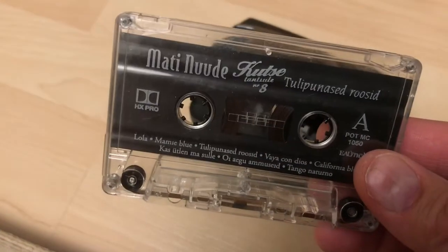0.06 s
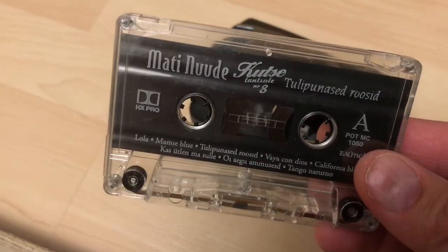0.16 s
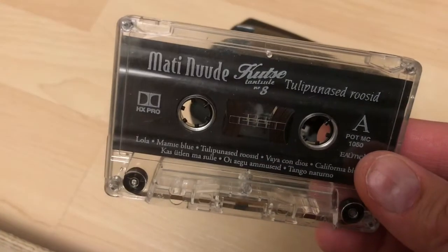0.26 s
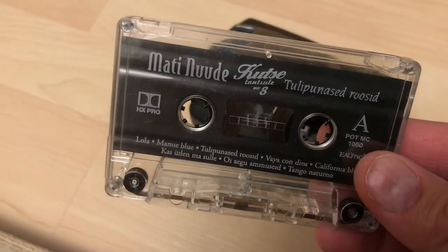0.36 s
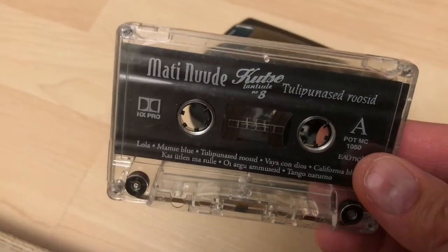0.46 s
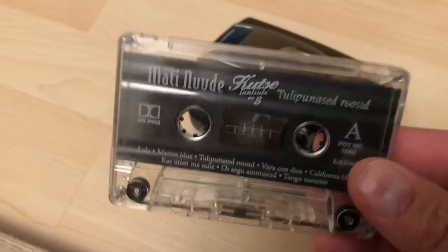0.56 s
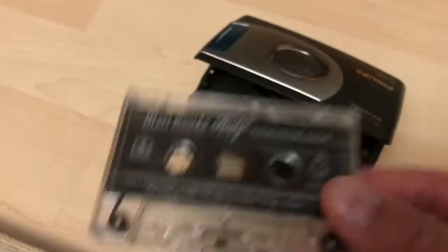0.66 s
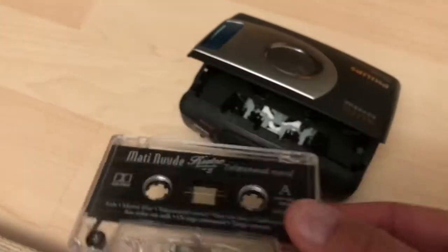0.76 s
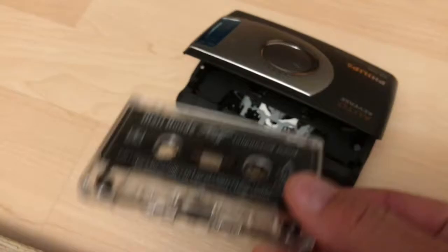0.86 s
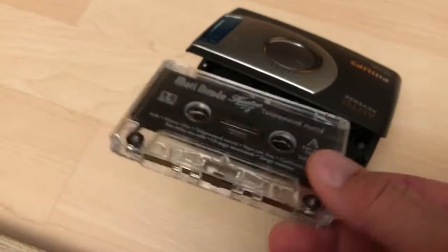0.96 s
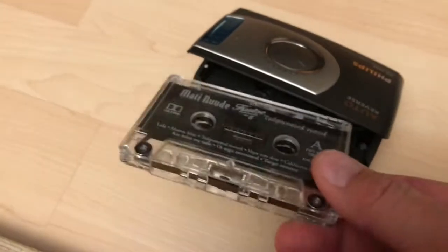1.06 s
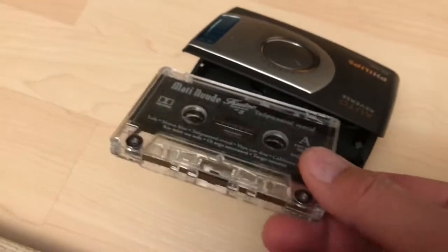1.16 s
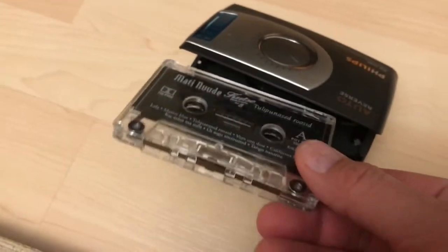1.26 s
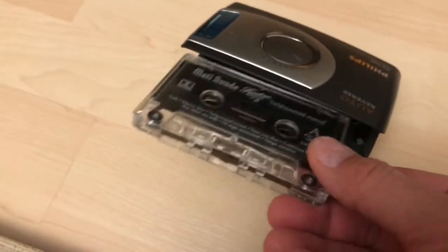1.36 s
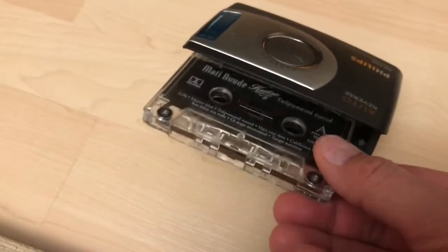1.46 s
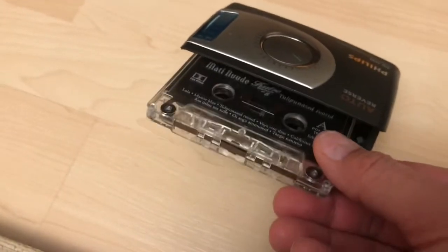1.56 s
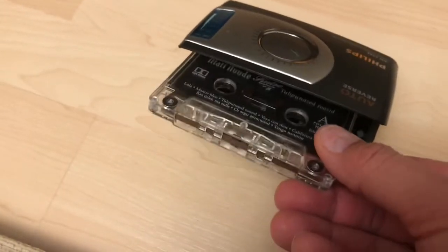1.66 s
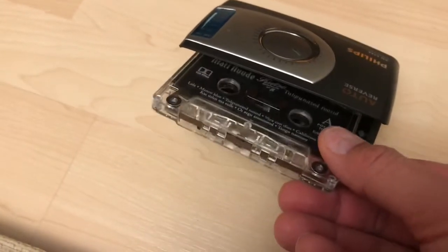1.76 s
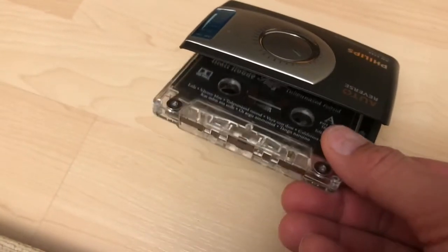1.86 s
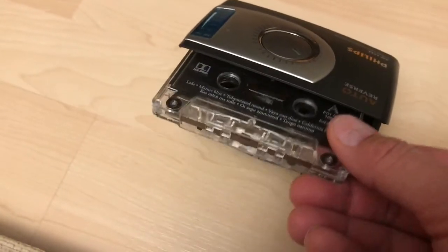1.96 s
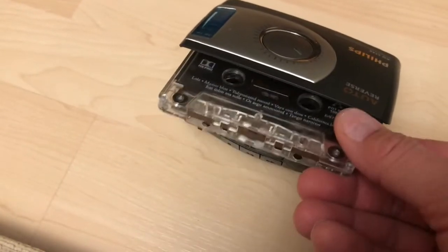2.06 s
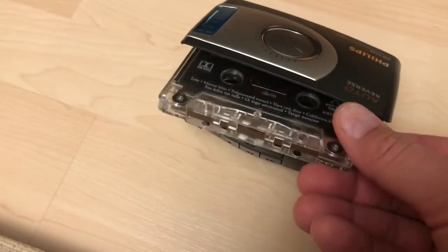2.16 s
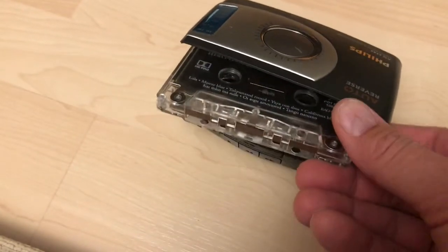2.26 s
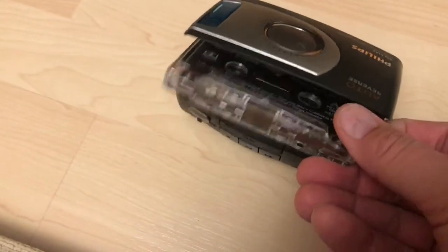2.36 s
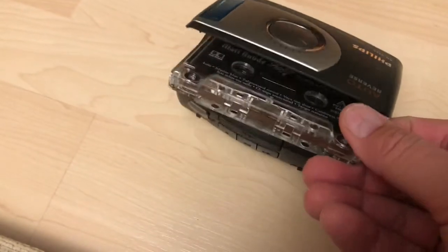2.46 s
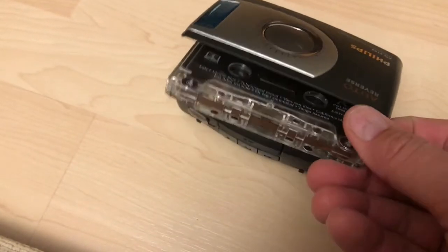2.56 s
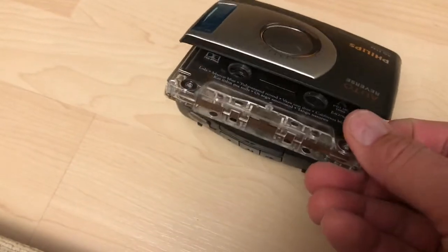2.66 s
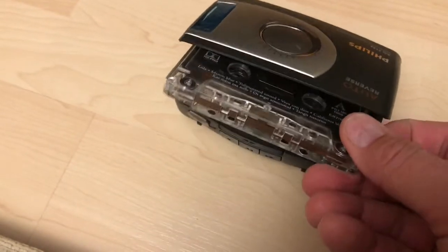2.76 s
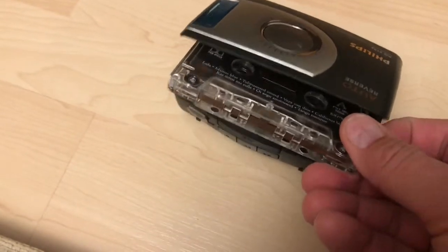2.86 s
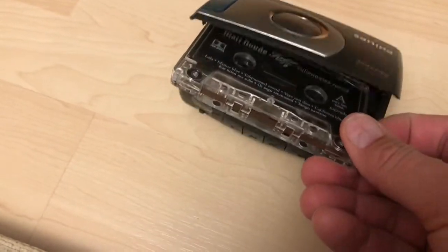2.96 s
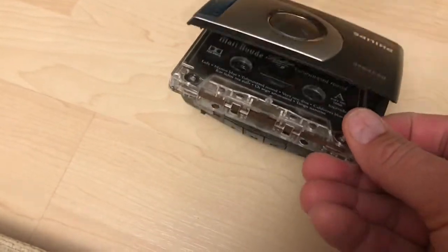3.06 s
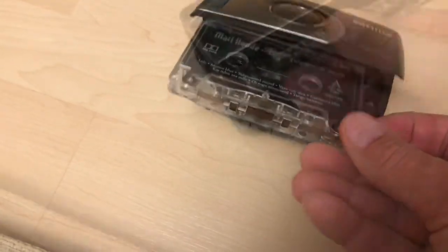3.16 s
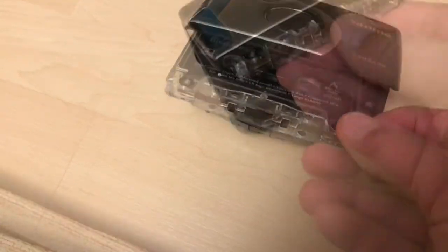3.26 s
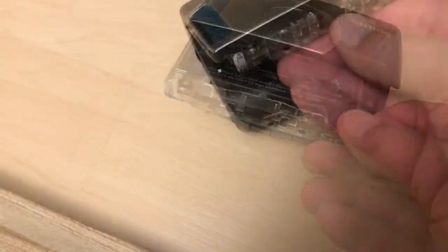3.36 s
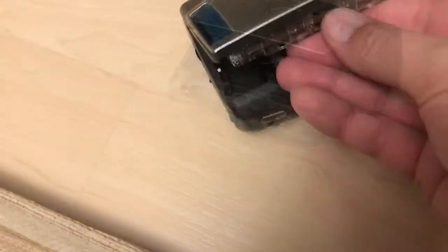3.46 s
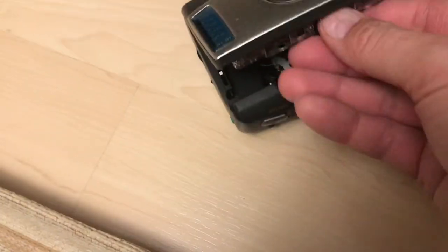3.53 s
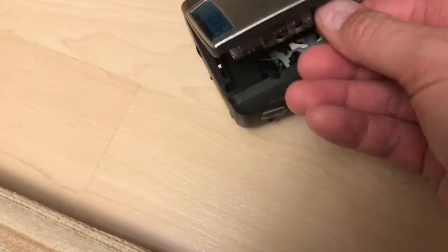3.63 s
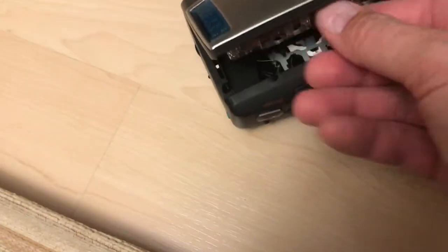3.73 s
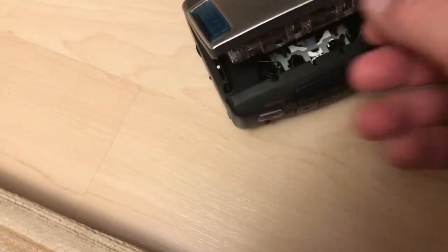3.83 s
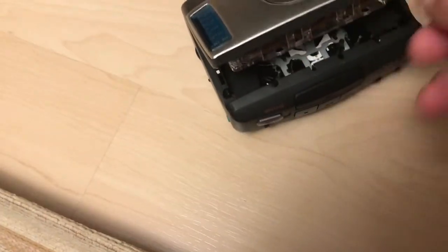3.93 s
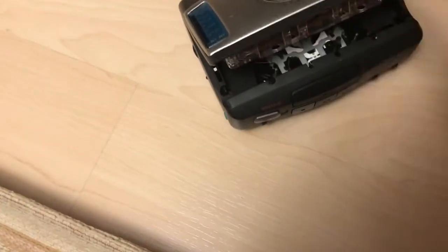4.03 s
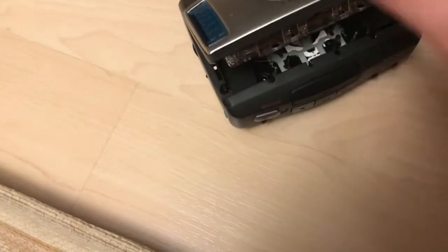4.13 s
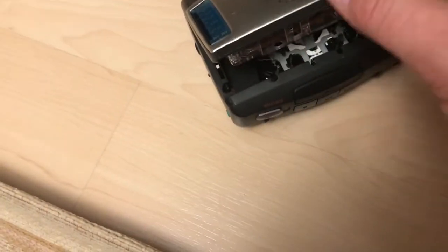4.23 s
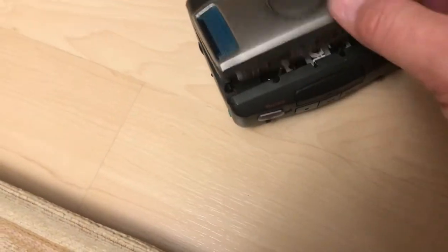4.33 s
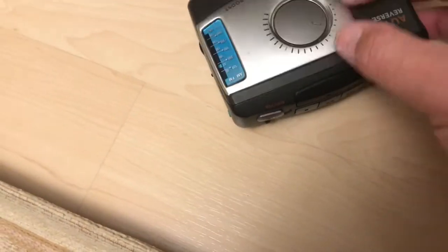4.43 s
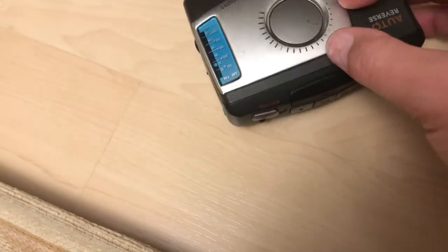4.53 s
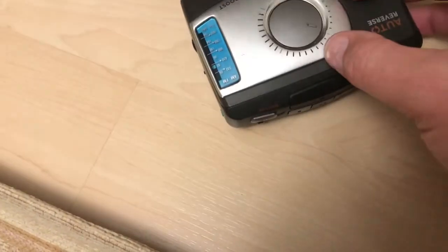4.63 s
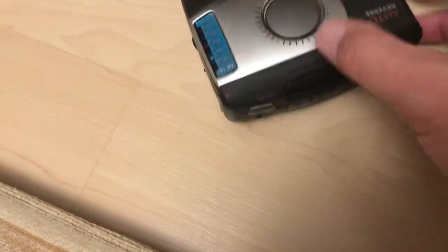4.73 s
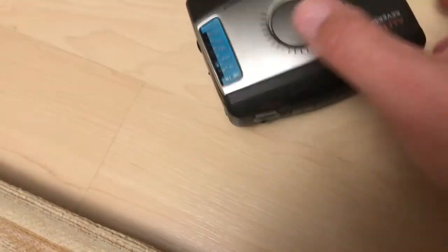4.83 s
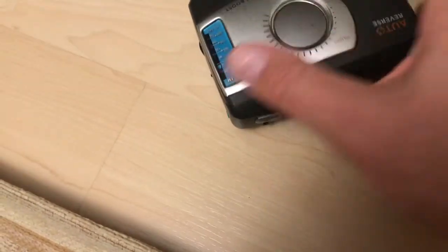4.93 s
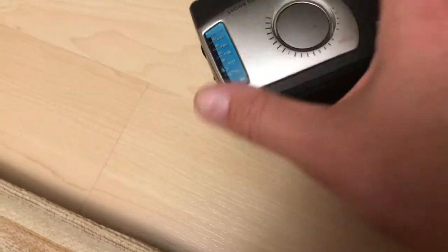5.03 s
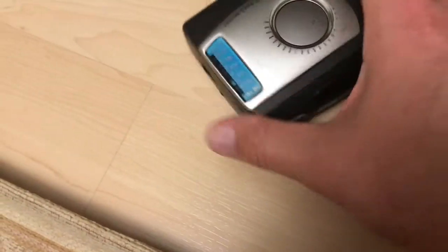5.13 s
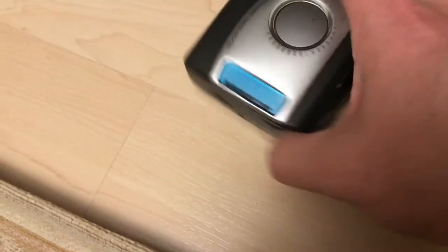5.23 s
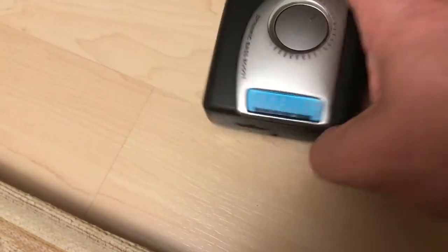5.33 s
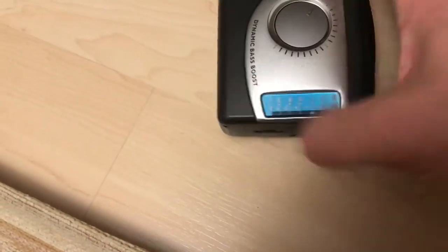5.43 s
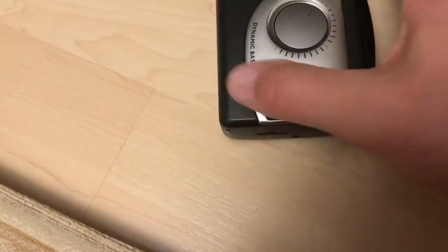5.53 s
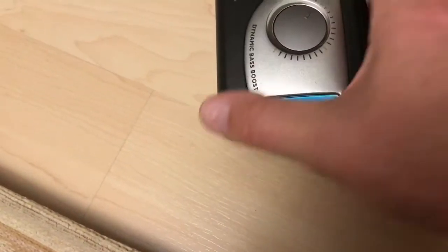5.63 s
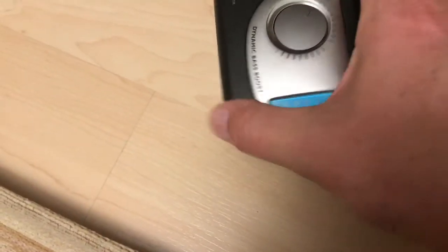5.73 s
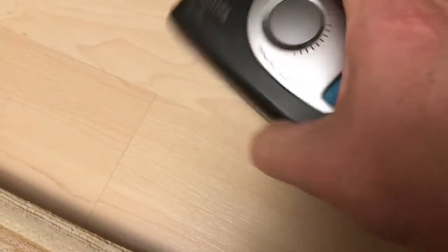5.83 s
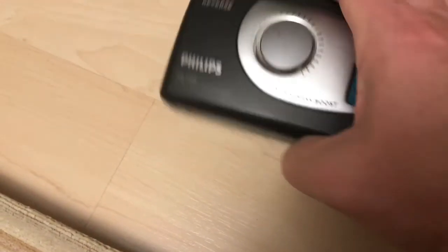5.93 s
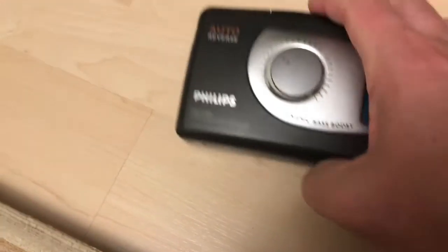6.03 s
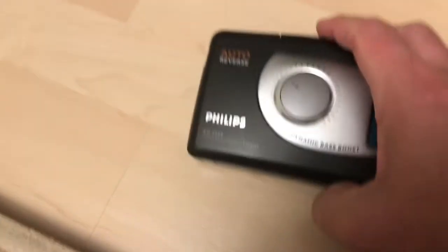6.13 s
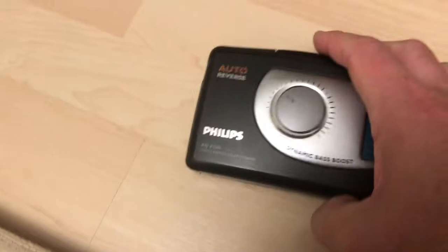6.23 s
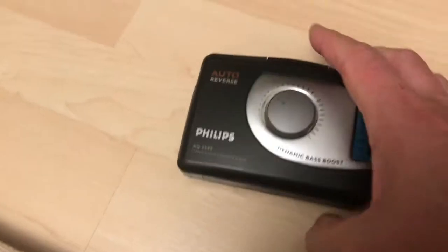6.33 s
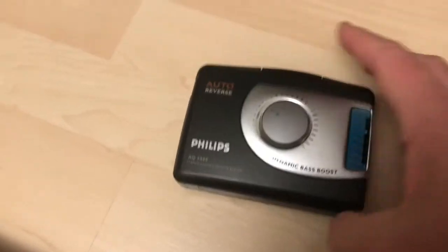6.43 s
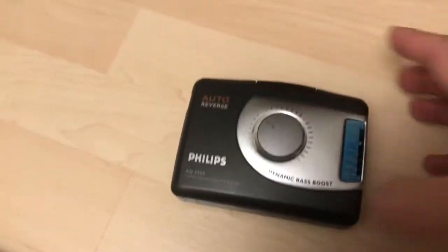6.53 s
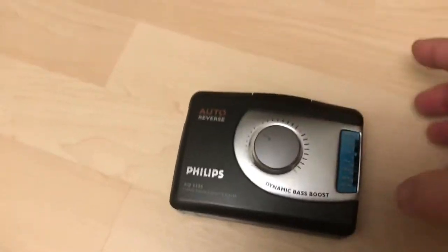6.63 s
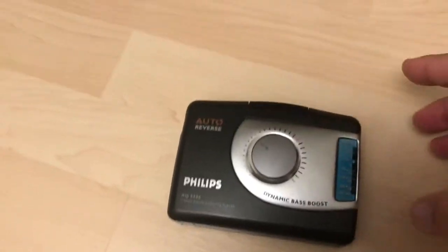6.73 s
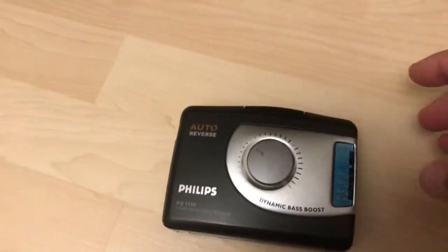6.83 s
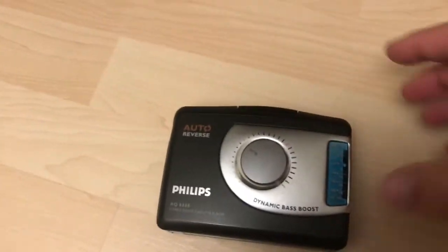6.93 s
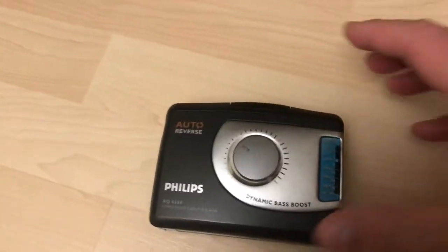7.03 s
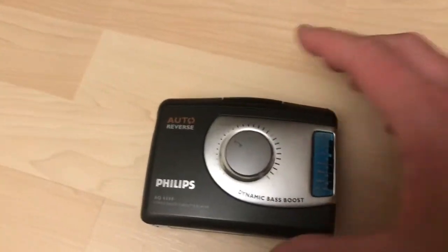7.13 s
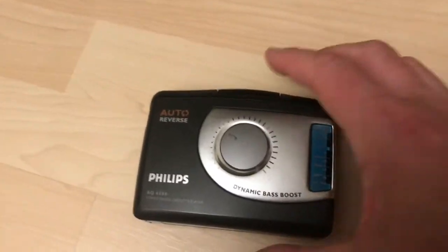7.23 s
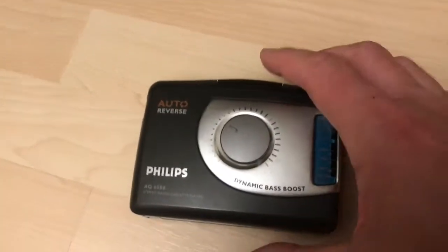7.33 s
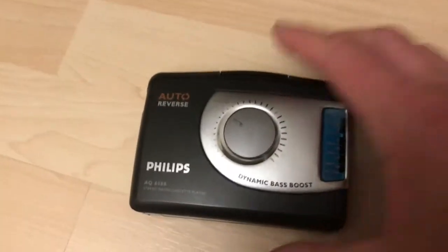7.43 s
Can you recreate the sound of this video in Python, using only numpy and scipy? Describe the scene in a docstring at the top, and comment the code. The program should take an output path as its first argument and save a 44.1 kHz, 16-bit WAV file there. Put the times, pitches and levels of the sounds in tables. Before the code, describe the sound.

Close to the microphone in a quiet room, a hard plastic cassette shell ticks, then rattles and scrapes as it slides into a portable player, with a tiny bright spring ring. The lid shuts with a loud sharp double snap and a low thud on the wooden floor. Smaller knocks and rubs follow as the player is turned and set down. A far clock ticks faintly over low rumble and soft hiss.

```python
"""Cassette into a portable player

A cassette is eased into the lid of a player on a wooden floor; the lid snaps shut and the player is turned and set
down. Close by, clusters of contacts drive plastic resonances, grains make the rubs, a plucked steel spring rings and
the boards thud in damped sines. Far off a pendulum clock ticks in ringing modes, heard mostly by the walls.
Behind it lie a low wavering rumble, a drone and murmur of filtered noise, a whine that stops, and steady hiss."""
import sys
import numpy as np
from scipy import signal
from scipy.fft import rfft, irfft
from scipy.io import wavfile

SR = 44100
rng = np.random.default_rng(int(sys.argv[2]) if len(sys.argv) > 2 else 0)


def wav_out(sig):
    """Save sig, one row per channel (or a flat mono array), as 16-bit PCM at SR to the path in sys.argv[1]."""
    wavfile.write(sys.argv[1], SR, np.round(np.clip(np.atleast_2d(sig).T, -1, 1) * 32767).astype(np.int16))


N = 330529
BLOW = 1600  # samples a blow may last
SWELL_MS = 0.33  # time constant with which a blow builds up


def from_db(db):
    """Decibels to gain."""
    return 10 ** (np.asarray(db) / 20)


def rms_one(x):
    """Scaled to rms 1."""
    return x / np.sqrt(np.mean(x ** 2) + 1e-20)


def in_time(rows):
    """Columns of a curve at every sample, in straight lines between the rows."""
    s, *columns = np.transpose(rows)
    return [np.interp(np.arange(N) / SR, s, column) for column in columns]


def cut(x, hz, kind, order=2):
    """Low- or high-pass."""
    return signal.sosfilt(signal.butter(order, hz, kind, fs=SR, output="sos"), x)


def band(x, low_hz, high_hz):
    """Band-pass."""
    return signal.sosfilt(signal.butter(2, [low_hz, high_hz], "band", fs=SR, output="sos"), x)


def resonate(x, hz, width_hz):
    """A two-pole resonance whose answer to a unit click peaks near 1."""
    radius = np.exp(-np.pi * max(width_hz, 3) / SR)
    angle = 2 * np.pi * hz / SR
    return signal.lfilter([np.sin(angle)], [1, -2 * radius * np.cos(angle), radius * radius], x + 1e-18)


def place(s, sounds):
    """Short sounds, one a row, laid down at their times."""
    at = (s * SR).astype(int)[:, None] + np.arange(sounds.shape[1])
    return np.bincount(at.ravel(), sounds.ravel(), N + sounds.shape[1])[:N]


def chatter(decay_ms, count):
    """A blow is a short cluster of contacts: noise that swells and dies."""
    ms = np.arange(BLOW) / SR * 1000
    swell = 1 - np.exp(-ms / SWELL_MS)
    return rng.standard_normal((count, BLOW)) * swell * np.exp(-ms / np.clip(decay_ms, .2, 8))


def struck(rows, modes, level_db, contact_ms):
    """Blows, each a time in seconds and a level in dB, set off modes that ring longer than the contact."""
    s, peak_db = np.transpose(rows)
    contacts = np.pad(chatter(contact_ms, count=len(s)), ((0, 0), (0, 3 * BLOW)))  # room to ring out
    sounds = 0
    for hz, mode_db, t60_s in modes:
        ring = resonate(contacts, hz, np.log(1000) / np.pi / t60_s)
        sounds = sounds + from_db(mode_db) * ring / np.abs(ring).max(axis=1, keepdims=True)
    return place(s, from_db(peak_db + level_db)[:, None] * sounds)


# Colour of the hiss. Each row: frequency in Hz, relative level in dB per Hz.
HISS_COLOUR = [(200, -32), (320, -8), (450, -18.5), (1000, -16.5), (1600, -17), (2200, -20), (7000, -25),
               (16000, -30)]
HISS_DB = -70  # rms


def hiss():
    """Steady air and microphone noise: white noise shaped in the spectrum."""
    hz = np.arange(N // 2 + 1) * SR / N + 1
    at_hz, level_db = np.transpose(HISS_COLOUR)
    shape = from_db(np.interp(np.log(hz), np.log(at_hz), level_db))
    return from_db(HISS_DB) * rms_one(irfft(rfft(rng.standard_normal(N)) * shape, N))


# Low rumble of the room. Each row: time in seconds, lower tone in dB, upper tone in dB.
RUMBLE_LEVELS = [(0.0, -67.5, -63.5), (0.79, -68, -64.5), (1.02, -56, -79), (2.21, -59.5, -72),
                 (2.29, -48.5, -65), (3.44, -65.5, -61), (4.67, -66, -64), (4.71, -56, -48),
                 (5.34, -73, -61), (5.76, -57, -63), (5.88, -53, -50), (6.13, -62, -76), (6.32, -47, -49.5),
                 (6.61, -52, -59.5), (6.99, -53, -44.5), (7.18, -53.5, -66), (7.32, -62.5, -41.5),
                 (7.49, -57.5, -44)]
# Pitches of the rumble: lower tone in Hz, upper tone in Hz.
RUMBLE_TONES_HZ = (57.5, 71.5)
# Drone near 215 Hz and dull murmur. Each row: time in seconds, drone in dB, murmur in dB.
DRONE_LEVELS = [(0.0, -105, -73.5), (3.2, -80, -62), (3.4, -64, -63), (5.13, -59.5, -60), (7.49, -56, -56)]
# Two faint narrow tones that stop. Each row: pitch in Hz, level in dB.
WHINE_TONES = [(243, -77), (320, -76.5)]
WHINE_ENDS_S = 2.9


def rumble(width_hz):
    """Two nearly pure low tones that trade levels, a narrow drone, a dull murmur and a faint whine."""
    drone_db, murmur_db = in_time(DRONE_LEVELS)
    t, white = np.arange(N) / SR, rng.standard_normal((4, N))
    waver = np.cumsum(white[:2], axis=1) * np.sqrt(2 * np.pi * width_hz / SR)  # the phase walks at random
    tones = np.sqrt(2) * np.sin(2 * np.pi * np.outer(RUMBLE_TONES_HZ, t) + waver)
    low = band(np.sum(from_db(in_time(RUMBLE_LEVELS)) * tones, axis=0), 30, 140)
    drone = from_db(drone_db) * rms_one(resonate(resonate(white[2], 213, 9), 213, 18))
    murmur = from_db(murmur_db) * rms_one(band(white[3], 75, 240))
    whine = sum(from_db(db) * rms_one(resonate(white[2], hz, 5.2)) for hz, db in WHINE_TONES)
    return low + drone + murmur + (t < WHINE_ENDS_S) * whine


# Two stretches of steady beating, far off.
# Each row: first tick in seconds, first tock in seconds, number of swings, level in dB before trim.
CLOCK_STRETCHES = [(0.1086, 0.61, 3, -44.5), (4.009, 3.434, 4, -40.5)]
SWING_S = 1.093  # from one tick to the next


def beats(which):
    """Times and levels of the ticks (0) or tocks (1), one a swing."""
    return [(row[which] + SWING_S * k, row[3]) for row in CLOCK_STRETCHES for k in range(int(row[2]))]


# Ringing modes of the tick. Each row: pitch in Hz, relative level in dB, 60 dB decay in seconds.
TICK_MODES = [(873, -25.5, 0.038), (1680, -19, 0.1), (1893, 2, 0.049), (2120, 1, 0.033), (2310, 3, 0.039),
              (2793, -11.5, 0.11), (2860, -26, 0.048)]
# Ringing modes of the tock. Each row: pitch in Hz, relative level in dB, 60 dB decay in seconds.
TOCK_MODES = [(1550, -11, .05), (2380, -1, 0.015), (2334, -4.5, 0.059), (2670, -9, 0.022), (2800, -16, .04)]


def pendulum_clock():
    """Each half swing strikes its own set of modes; the tock's contact is shorter."""
    ticks = struck(beats(0), TICK_MODES, level_db=-9.5, contact_ms=2.4)
    return ticks + struck(beats(1), TOCK_MODES, level_db=-6.5, contact_ms=0.73)


ROOM_T60_S, ROOM_DB, WALL_CUT_HZ = 0.32, -17, 4200


def room(x):
    """A dying noise as the room's answer, duller as it fades."""
    t = np.arange(SR // 2) / SR
    fade = from_db(-60 * t / ROOM_T60_S) * np.minimum(t / 0.0059, 1)
    white = rng.standard_normal(len(t))
    dull = cut(white, WALL_CUT_HZ, "low", order=1)
    treble = from_db(3) * (white - dull) * from_db(-60 * t / 0.16)  # fades faster than the rest
    tail = fade * (dull + treble)
    return signal.fftconvolve(x, tail / np.sqrt(np.sum(tail ** 2)))[:N]


# The player thuds on the boards. Each row: start in seconds, level in dB before trim, pitch in Hz.
FLOOR_THUDS = [(1.949, -49.5, 147), (2.6, -43, 85), (3.044, -37.5, 103), (3.523, -37.5, 158),
               (3.941, -39, 95), (4.372, -35.5, 85), (4.394, -20.5, 168.6), (4.712, -27, 162),
               (4.72, -33, 108), (4.843, -34.5, 190), (4.884, -32, 143), (5.739, -33.5, 172.3),
               (5.779, -33, 172.5), (5.927, -37.5, 165), (6.309, -40, 81.6), (6.343, -29.5, 155)]
THUD_WIDTH_HZ = 36  # damping


def thuds():
    """The boards answer a soft push with one low, quickly damped ring."""
    s, peak_db, hz = np.transpose(FLOOR_THUDS)
    t = np.arange(4000) / SR
    fade = (1 - np.exp(-t / 0.00077)) * np.exp(-np.pi * THUD_WIDTH_HZ * t)
    return place(s, from_db(peak_db + 2.0)[:, None] * fade * np.sin(2 * np.pi * hz[:, None] * t))


# What a stroke rubs up, low, middle and high. Each row: from Hz, to Hz.
RUBBED_BANDS = [(400, 1900), (1900, 4300), (4300, 16000)]
# How fast a stroke dies away: low, middle and high resonances in dB per second.
LET_GO_DB_PER_S = (249, 399.5, 700.5)
PRESS_DB_PER_S = 700.5  # a stroke swells in this fast
ARCH_DB = 5  # a stroke is this much softer at its ends than in its middle


def stroked(strokes, rest):
    """Gains of the three bands: each stroke swells in, arches and dies away over the resting hand."""
    t = np.arange(0, N + 32, 32) / SR
    start, end, *levels_db = np.transpose(strokes)[:, :, None]
    early, late = np.maximum(start - t, 0), np.maximum(t - end, 0)
    held = (t >= rest[0]) & (t <= rest[1])
    arch_db = ARCH_DB * np.clip(2 * (t - start) / (end - start) - 1, -1, 1) ** 2
    gains = []
    for db, fall, rest_db in zip(levels_db, LET_GO_DB_PER_S, rest[2:]):
        strokes_gain = from_db(db - arch_db - PRESS_DB_PER_S * early - fall * late).sum(axis=0)
        gains.append(np.interp(np.arange(N) / SR, t, strokes_gain + held * from_db(rest_db)))
    return gains


def rub(strokes, rest, body, grains_per_s, spread_db, skin_db):
    """Surfaces catch and slip: dense uneven grains into the body; skin and cloth add a broad hiss on top."""
    sizes = from_db(spread_db * np.minimum(rng.exponential(1, N), 5)) * rng.choice([-1, 1], N)
    grip = from_db(2.0 * rms_one(band(rng.standard_normal(N), 12, 80)))  # the grip tightens and slackens
    grains = grip * sizes * (rng.random(N) < grains_per_s / SR)
    skin = cut(grains, 3600, "low", order=1)
    out = 0
    for gain, (low_hz, high_hz) in zip(stroked(strokes, rest), RUBBED_BANDS):
        rings = sum(from_db(db) * resonate(grains, hz, width)
                    for hz, width, db in body if low_hz < hz < high_hz)
        plastic = rms_one(cut(rings, low_hz, "high"))
        skin_hiss = from_db(skin_db) * rms_one(band(skin, low_hz, high_hz))
        out = out + gain * rms_one(plastic + skin_hiss)
    return out


# Resonances of the cassette shell. Each row: pitch in Hz, width in Hz, relative level in dB.
SHELL_BODY = [(462, 160, -2.5), (1037, 500, 9), (1310, 217, 11.5), (1614, 126, 4), (2184, 345, 3.5),
              (2412, 270, 1), (3125, 320, 0), (3490, 250, 2), (4180, 240, -2.5), (5370, 1500, -29),
              (6070, 1120, 17.5), (7050, 350, 10), (8050, 860, 9.5), (9650, 200, 5), (11000, 900, 8),
              (14300, 1500, -8)]
# Resonances of the player case. Each row: pitch in Hz, width in Hz, relative level in dB.
CASE_BODY = [(500, 250, -13), (927, 119, 14), (1122, 210, 13), (1490, 520, 11), (2510, 73, -12),
             (2660, 150, -6), (3250, 450, 0.5), (3770, 230, -1.5), (4470, 130, -11.5), (6000, 1200, 7.5),
             (7180, 480, 3), (7860, 200, -7), (8500, 560, 3.5), (10700, 4200, 9), (11970, 430, 1),
             (14500, 1800, -9.5)]
# Strokes on the shell. Each row: start in seconds, end in seconds, low, middle and high resonances in dB.
STROKES_ON_SHELL = [(.62, .725, -70, -63.5, -62.5), (.84, .965, -70, -68, -64.5),
                    (1.66, 1.8, -73, -68, -79), (2.065, 2.12, -61, -63, -60), (2.17, 2.36, -58.5, -55, -57),
                    (2.47, 2.72, -63, -66, -73.5), (2.905, 2.94, -52, -57, -65),
                    (2.985, 3.02, -53.5, -54, -54), (3.06, 3.32, -59.5, -59.5, -68),
                    (3.48, 3.54, -45, -44.5, -49.5), (3.57, 3.66, -68, -65, -69),
                    (3.715, 3.815, -55, -54, -59), (3.92, 4.04, -57.5, -68, -76)]
# Strokes on the case. Each row: start in seconds, end in seconds, low, middle and high resonances in dB.
STROKES_ON_CASE = [(4.27, 4.36, -58, -56.5, -62), (4.53, 4.72, -56, -59, -65.5), (4.8, 4.95, -53, -59, -69),
                   (5.06, 5.17, -54.5, -56.5, -65), (5.21, 5.33, -53.5, -51.5, -57.5),
                   (5.35, 5.45, -63.5, -66, -73), (5.737, 5.82, -49, -49, -55),
                   (5.855, 5.94, -53, -53.5, -64.5), (5.96, 6.13, -59.5, -63, -76),
                   (6.27, 6.44, -56.5, -60.5, -71.5), (6.55, 6.87, -66.5, -69, -70.5)]
# The hand merely holds the shell: start in seconds, end in seconds, low, middle and high in dB.
HOLDING_SHELL = (0, 4.2, -77, -81, -98.5)
# The hand merely holds the case: start in seconds, end in seconds, low, middle and high in dB.
HOLDING_CASE = (5.5, 7.49, -66.5, -74, -82.5)


def rubbing():
    """Hands and plastic slide on the cassette shell and on the player case."""
    shell = rub(STROKES_ON_SHELL, HOLDING_SHELL, SHELL_BODY, grains_per_s=6000, spread_db=3.2, skin_db=-3)
    return shell + rub(STROKES_ON_CASE, HOLDING_CASE, CASE_BODY, grains_per_s=7000, spread_db=3.2, skin_db=0.4)


# Plucks of the guide spring. Each row: start in seconds, level in dB before trim.
SPRING_PLUCKS = [(2.5775, -40), (2.5858, -40), (2.596, -46), (3.5318, -40), (3.542, -45)]
# Modes of the spring. Each row: pitch in Hz, relative level in dB, 60 dB decay in seconds.
SPRING_MODES = [(7640, -4, 0.043), (8860, 3.5, 0.027), (10400, 6.5, 0.034), (11930, 2, 0.066),
                (14240, 1, 0.037)]


def guide_spring():
    """Brief contacts set a small steel spring ringing in high modes."""
    return struck(SPRING_PLUCKS, SPRING_MODES, level_db=-4.0, contact_ms=0.79)


SOFT_HZ, SMALL_HZ = 4800, 330  # low modes answer only a blow's soft part; a small body sends out little bass
CRACK_DB, BRIGHT_CRACK_DB = -9, -5.5  # the many small modes blur into a broad crack
CHATTER_MS, CHATTER_MS_PER_DB = 2.69, 0.12  # decay of a knock at -30 dB; harder knocks chatter longer


def peaking(sounds, db):
    """Each row scaled to its own peak level."""
    return (from_db(db) / np.abs(sounds).max(axis=1))[:, None] * sounds


def knocks(rows, body):
    """Each knock drives every resonance of the body; broad contacts boom, edge contacts snap."""
    s, peak_db, boom_db, snap_db, spot_hz = np.transpose(rows)
    decay_ms = CHATTER_MS + CHATTER_MS_PER_DB * (peak_db + 30)
    contacts = chatter(decay_ms[:, None], count=len(s))
    soft = cut(contacts, SOFT_HZ, "low")
    spot_db = rng.normal(0, 2, (len(s), len(body)))  # no two blows land alike
    sounds = peaking(band(soft, 1500, SOFT_HZ), peak_db + CRACK_DB)
    sounds += peaking(cut(contacts, 11000, "high"), peak_db + snap_db + BRIGHT_CRACK_DB)
    for k, (hz, width_hz, level_db) in enumerate(body):
        boom = np.interp(hz, [1700, 2100], [1, 0])  # share of the panel boom
        snap = np.interp(hz, [4200, 5600], [0, 1])  # share of the bright snap
        push = soft if hz < SOFT_HZ else cut(contacts, hz / 2, "high")
        favour_db = 6 * np.exp(-(np.log(hz / spot_hz) / 0.17) ** 2)  # modes near the spot's pitch
        ring_db = peak_db + level_db - 10.0 + boom * boom_db + snap * snap_db + favour_db + spot_db[:, k]
        sounds = sounds + (-1) ** k * peaking(resonate(push, hz, width_hz), ring_db)
    return cut(place(s, sounds), SMALL_HZ, "high")


# Knocks of the cassette shell. Each row: start in seconds, level in dB before trims, panel boom in dB,
# bright snap in dB, pitch the struck spot favours in Hz.
KNOCKS_ON_SHELL = [(0.6208, -44, -6.5, -9, 2620), (0.845, -49.5, -7, -5, 4580),
                   (1.0078, -47, -1.5, -8, 3500), (1.5589, -44.5, -5.5, -14, 3370),
                   (1.6004, -43, -1, -4, 3360), (1.6371, -24.5, -1.5, -15.5, 4210),
                   (1.817, -43, -1.5, -21, 1710), (1.921, -26, -1, -8, 4040), (1.9299, -35.5, 5, -12, 3540),
                   (1.9472, -31.5, 1.5, -13, 4100), (2.0822, -26, 1, -14.5, 4100),
                   (2.168, -40, -1, -1, 3270), (2.18, -39, 3, -3, 3330), (2.1921, -33.5, -4, -9.5, 3570),
                   (2.3158, -15.5, -47, -13, 3230), (2.3294, -30.5, -6.5, -6, 3450),
                   (2.383, -21, -11, -13, 1950), (2.395, -30.5, -14, -2.5, 3470),
                   (2.4497, -35, -15, -24, 2030), (2.5366, -51, 6, 9, 3150), (2.5724, -33, -4, -9, 3860),
                   (2.5917, -30.5, -0.5, -17, 2930), (2.6549, -39, 3, -15.5, 2125),
                   (2.808, -38.5, 0, -13, 1870), (2.8576, -26.5, -15.5, -13, 3220),
                   (2.871, -53, -5, 2, 2160), (2.9058, -43.5, -3, -5, 3180),
                   (2.9302, -33.5, -2.5, -6.5, 3300), (2.9854, -31, -25, -13.5, 2160),
                   (2.9922, -34.5, -4.5, -15, 3510), (3.0078, -33, -8, -10.5, 1700),
                   (3.0205, -29.5, -12, -18, 1690), (3.051, -29.5, -4.5, -14, 3220),
                   (3.0913, -38.5, -11, -9, 3100), (3.1239, -22, -7, -13, 3700),
                   (3.1681, -24.5, -10.5, -13, 2120), (3.18, -35, -7, -3, 3480),
                   (3.2157, -23, -12, -13.5, 1690), (3.2327, -35, -1, -7, 1700),
                   (3.2443, -34, -16, -13, 3200), (3.2592, -37, -20, -19, 3080),
                   (3.2687, -30.5, -3.5, -17, 3070), (3.2876, -35, -12, -27, 3560),
                   (3.2984, -41, 2.5, -6, 3170), (3.3064, -40.5, -1, -8, 1710),
                   (3.3135, -35.5, -4.5, -16, 1700), (3.482, -26.5, 0.5, -19, 2340),
                   (3.492, -23.5, -2, -18, 1820), (3.5074, -26.5, -9, -11.5, 3670),
                   (3.5197, -20, -0.5, -18, 3540), (3.5307, -25, -3.5, -15, 2120),
                   (3.549, -35, -5, -12, 2120), (3.7089, -36.5, -8, -29, 3570), (3.7298, -36, 2, -10, 3630),
                   (3.7729, -37, -1.5, -10, 3050), (3.7855, -27, 1.5, -18, 3200),
                   (3.8102, -34, -2, -21, 2960), (3.918, -27.5, -0.5, -19, 3340),
                   (3.9279, -27, -4, -17, 3060), (3.943, -26, -8.5, -25.5, 3340),
                   (3.953, -35, -3, -24, 3210), (3.9664, -39, 3.5, -19, 2910)]
# Knocks of the player case, lid snap included. Each row: start in seconds, level in dB before trims,
# panel boom in dB, bright snap in dB, pitch the struck spot favours in Hz.
KNOCKS_ON_CASE = [(4.2537, -21.5, -8, -9.5, 1580), (4.2654, -27, -12.5, -14, 3440),
                  (4.2961, -34, -35, -8, 2860), (4.3544, -33, -6, -12, 1700), (4.366, -27.5, -12, -6, 4000),
                  (4.3694, -14, -7, -13, 1700), (4.373, -4.5, -15.5, -2, 3960),
                  (4.3804, -13, -3.5, -2, 3170), (4.3949, -3.5, -6.5, -5, 3570),
                  (4.4094, -36, -8, -16, 2850), (4.4154, -33, -12, -18, 2620), (4.4573, -29, -7, -15, 2850),
                  (4.7087, -13.5, -9.5, -17.5, 3350), (4.7227, -17, -11.5, -7, 3540),
                  (4.7364, -31, 2.5, -17, 3060), (4.7681, -35.5, -10, -22, 3300),
                  (4.8394, -18, -6, -20, 3260), (4.8504, -23, -12, -4.5, 2900),
                  (4.8833, -19, -10, -21, 2970), (4.8944, -34.5, -0.5, -17.5, 1950),
                  (4.9506, -28, -9.5, -25.5, 3330), (4.9696, -30, -8, -32, 2860),
                  (5.5034, -55.5, -2, -11.5, 1790), (5.7379, -34.5, -4, -18, 2020),
                  (5.7664, -36, -14, -10, 3600), (5.7808, -31, -3.5, -13, 3100),
                  (5.8004, -31, -10, -18, 2750), (5.8084, -34, -16, -14, 3670), (5.8576, -38, -9, -9, 4280),
                  (5.8696, -27, -17, -14, 3710), (5.9025, -37.5, -10.5, -7.5, 3180),
                  (6.2567, -29, -6, -20.5, 3130), (6.3081, -21.5, -8.5, -13.5, 3050),
                  (6.3207, -27.5, -7, -7, 2890), (6.3435, -22.5, -9, -27, 2850),
                  (6.3474, -38, -8, -19, 2850), (6.3969, -33, -5.5, -18, 3060),
                  (6.4114, -37, -6, -23.5, 3100), (7.2828, -42.5, -1.5, -18.5, 1680)]


def plastic_knocks():
    """The cassette shell, then the player case, each knocking through its own resonances."""
    return knocks(KNOCKS_ON_SHELL, SHELL_BODY) + knocks(KNOCKS_ON_CASE, CASE_BODY)


def scene():
    """Player, hands and clock in the room, over its rumble and hiss."""
    background = hiss() + rumble(width_hz=4.4)
    clock = pendulum_clock()
    player = plastic_knocks() + guide_spring()
    reverb = room(from_db(ROOM_DB) * player + from_db(2.0) * clock)  # the far clock is heard mostly by the walls
    return (background + clock + reverb + thuds() + rubbing() + player)[None]


def record(dry):
    """The microphone drops the deepest bass, the highest peaks are rounded, the top is cut."""
    dry = cut(dry, 42, "high", order=3)
    dry = dry / (1 + np.abs(dry / .9) ** 4) ** .25
    return signal.sosfilt(signal.cheby2(12, 60, 16500, fs=SR, output="sos"), dry)  # 60 dB down from 16.5 kHz


dry = scene()
out = record(dry)
wav_out(out)
```